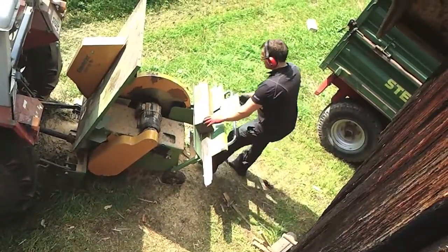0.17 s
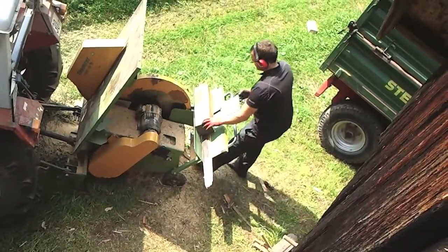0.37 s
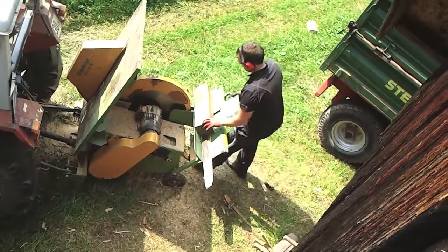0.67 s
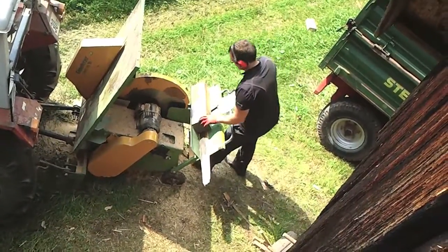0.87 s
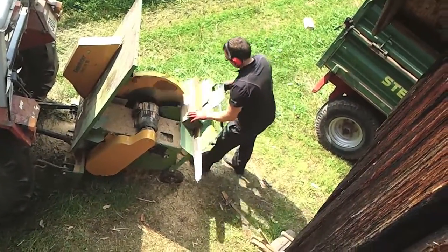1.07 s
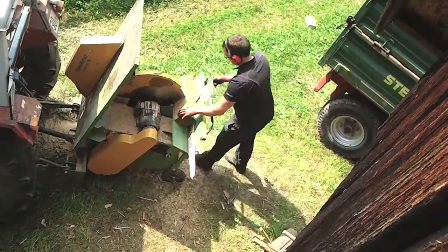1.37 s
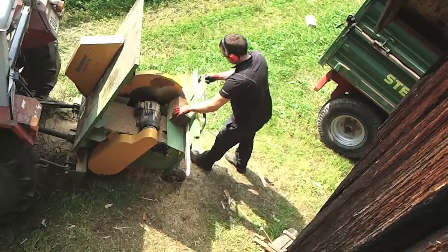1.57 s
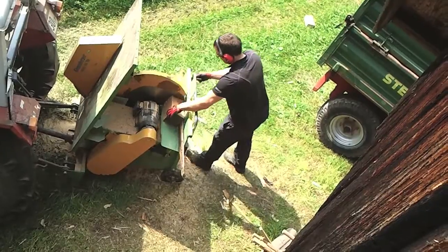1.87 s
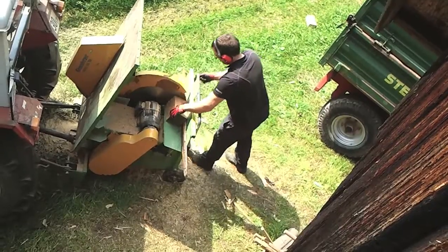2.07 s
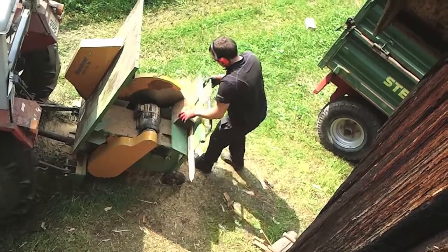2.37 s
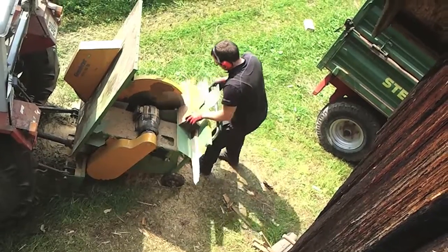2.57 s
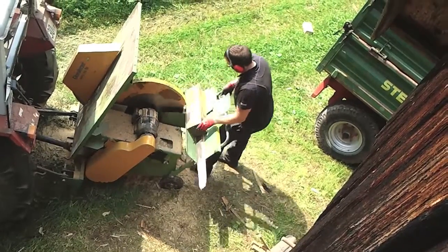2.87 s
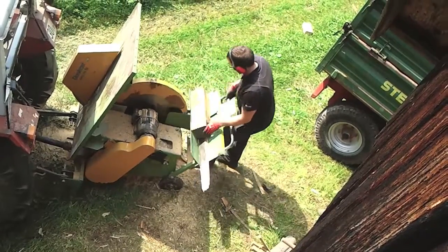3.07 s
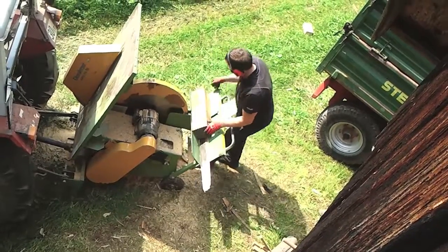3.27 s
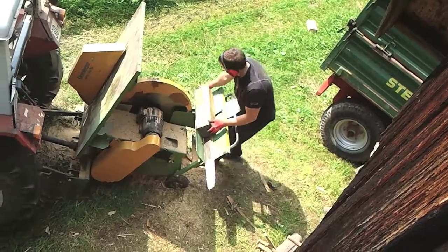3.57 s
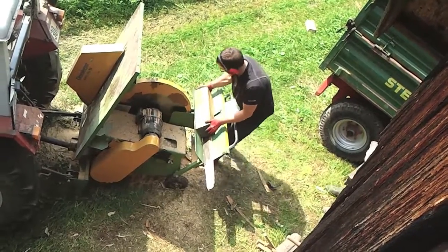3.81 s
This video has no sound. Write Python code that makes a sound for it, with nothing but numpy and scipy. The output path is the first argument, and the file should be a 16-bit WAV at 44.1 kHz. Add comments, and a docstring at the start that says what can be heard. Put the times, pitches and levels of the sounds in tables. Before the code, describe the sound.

Outdoor firewood saw heard from a few metres: idling drone and rushing teeth, a long harsh cut with sinking pitch, a shorter second cut, ringing blade, then log thumps and sheet-metal clatter over the drone.

```python
"""Tractor-driven circular saw outdoors

The exhaust throbs as a sum of shaft orders over engine rumble; the teeth whip air into sliding noise and a whine.
Two cuts tear wood with uneven tooth bites and ring the blade modes; the shaft slows, most in the first.
Sheet metal rattles and clacks as bursts of noise; wooden blows ring decaying modes over a clatter."""
import sys
import numpy as np
from scipy import signal
from scipy.fft import rfft, irfft, next_fast_len
from scipy.io import wavfile
from scipy.ndimage import uniform_filter1d, map_coordinates

SR = 44100
rng = np.random.default_rng(int(sys.argv[2]) if len(sys.argv) > 2 else 0)


def gain_from_db(level_db):
    """Turn a decibel level (scalar or array-like) into a linear amplitude factor."""
    decades = np.asarray(level_db, float) / 20
    return 10 ** decades


def transcribe(signal):
    """Save signal, clipped to [-1, 1], as a 16-bit WAV file at the path in sys.argv[1]."""
    frames = np.atleast_2d(signal).T
    limited = np.clip(frames, -1, 1)
    pcm = np.round(limited * 32767).astype(np.int16)
    wavfile.write(sys.argv[1], SR, pcm)


N = 173754
T = np.arange(N) / SR

# shaft speed: time_s, speed_hz
SHAFT_SPEED = [(0, 20.05), (1.07, 20.05), (1.2, 19), (1.42, 17.1), (1.76, 15), (1.86, 15.8), (2.0, 16.8),
               (2.3, 18.6), (2.44, 19.05), (2.6, 19.1), (2.75, 19.5), (3.0, 19.77), (3.94, 20.05)]
# exhaust and blade rush, sinking while the first cut is loud: time_s, exhaust_db, rush_db
DRIVE_LEVELS = [(0, -16, -16), (1.065, -18.5, -16.5), (1.11, -39.5, -29.5), (1.58, -40, -31),
                (1.62, -31, -17.5), (1.78, -26.5, -23), (1.82, -22, -21.5), (1.95, -15, -17.5),
                (2.3, -14.5, -18), (2.43, -16, -16.5), (2.455, -31, -18), (2.49, -17, -17),
                (2.7, -18.5, -17.5), (2.76, -16, -14), (3.0, -13, -14), (3.94, -16, -17)]
# exhaust gain on the shaft orders, before focus: freq_hz, gain_db
EXHAUST_GAIN = [(20, -24.5), (40, -20.5), (60, -13.5), (80, -5.5), (97, 0.5), (120, -12.5), (140, -19.5),
                (165, -22.5), (195, -18), (280, -34)]
# how sharply the exhaust favours its strongest order: time_s, gain_db_factor
EXHAUST_FOCUS = [(2.3, 1), (2.9, 1.5)]
# engine and machine rumble spectrum: freq_hz, relative_db_per_hz
RUMBLE_SPECTRUM = [(130, -10), (215, -8.5), (311, -14.5), (390, -8.5), (693, -13), (1000, -8),
                   (1300, -36.5)]
# low engine noise spectrum: freq_hz, relative_db_per_hz
SUB_SPECTRUM = [(15, -9.5), (60, 5), (140, 1), (180, -32.5)]
# air whipped by the teeth at idle, before the guard: freq_hz, relative_db_per_hz
RUSH_SPECTRUM = [(800, -40), (1000, -14), (1150, -6), (1350, -2), (1480, 0), (1620, -3), (1850, -10),
                 (2250, -14), (3200, -25), (4200, -60)]
# blade guard resonances: freq_hz, gain_db
GUARD_MODES = [(1180, 5), (1245, 5), (1370, 3), (1455, 1), (1630, 0), (1705, 0), (2075, 2)]
# machine hiss spectrum: freq_hz, relative_db_per_hz
HISS_SPECTRUM = [(2000, -1), (2800, -9), (3640, 1), (6250, -9), (7070, -26), (7950, -44.5)]
# cradle rattles, before RATTLE_DB: start_s, level_db
RATTLE_EVENTS = [(0.0508, -19), (0.1207, -14), (0.158, -22.5), (0.2054, -15), (0.2695, -19), (0.33, -17),
                 (0.375, -19), (0.4239, -16.5), (0.4988, -18), (0.7637, -22), (0.7977, -18.5),
                 (0.9535, -20.5), (1.858, -10), (1.925, -11.5), (2.031, -17), (2.213, -19), (2.2714, -19.5),
                 (3.1148, -15), (3.1622, -8.5), (3.2045, -9.5), (3.2335, -15.5), (3.258, -13.5),
                 (3.3099, -15.5), (3.3543, -11), (3.458, -17.5), (3.565, -14), (3.684, -15), (3.738, -17.5),
                 (3.782, -20.5)]
# sheet metal spectrum: freq_hz, relative_db_per_hz
SHEET_SPECTRUM = [(1000, -17.5), (1500, -3), (2140, -1.5), (3190, -15.5), (4650, -17.5), (6870, -23.5),
                  (7950, -36.5)]
# bright metal clacks: start_s, level_db, centre_hz
CLACK_EVENTS = [(2.822, -20, 5770), (3.115, -20.5, 6660), (3.355, -26, 5040)]
# tumbling wood: start_s, level_db, centre_hz
KNOCK_EVENTS = [(3.118, -17.5, 443), (3.13, -13, 209), (3.166, -11.5, 382), (3.168, -17.5, 200),
                (3.198, -15, 520), (3.28, -14, 225)]
# wood modes: freq_hz
WOOD_MODES_HZ = [191, 226, 365, 400, 461, 689]
# one list per cut: time_s, cut_db, blade_ring_db
CUT_LEVELS = [
    [(1.068, -36.5, -30.5), (1.082, -10.5, -52), (1.17, -12, -35.5), (1.22, -9.5, -22), (1.33, -13, -26),
     (1.44, -12, -52.5), (1.6, -12, -27.5), (1.72, -8.5, -24.5), (1.79, -13.5, -14), (1.83, -17.5, -13.5),
     (1.845, -24, -19), (1.9, -36.5, -21), (2.0, -36, -22), (2.06, -55.5, -50.5)],
    [(2.2, -38, -40), (2.365, -32.5, -23), (2.39, -19, -22), (2.435, -27.5, -25.5), (2.447, -12.5, -22.5),
     (2.49, -19, -18.5), (2.6, -15.5, -25), (2.69, -13.5, -22.5), (2.74, -18.5, -19), (2.85, -26, -15.5),
     (2.88, -27, -19.5), (2.96, -63, -20), (3.02, -52.5, -26.5)],
]
# tearing fibre spectrum, before the bites and blade colour it: freq_hz, relative_db_per_hz
TEAR_SPECTRUM = [(700, -36.5), (1000, -9.5), (1400, -5.5), (1880, -8.5), (2300, -9), (4320, -6),
                 (6750, -10), (7390, -12.5), (7950, -15)]
# shaken log spectrum: freq_hz, relative_db_per_hz
LOG_SPECTRUM = [(90, -30), (140, -5.5), (458, -2), (900, -1), (1300, -27)]
# blade modes: freq_hz, relative_db (the level applies to the ring only)
BLADE_MODES = [(1700, -7), (1840, -5), (1965, 1), (2030, -5), (2245, -11), (2343, -11), (2546, -14),
               (2640, -15), (2845, -15), (3500, -18), (3835, -17), (4190, -17), (4550, -20)]
# microphone band limit: freq_hz, gain_db
MIC_RESPONSE = [(7000, 0), (7800, -20), (8100, -33.5), (8400, -49.5)]

IDLE_HZ, FULL_LOAD_SAG_HZ = 20.05, 3.4
SECOND_IDLE_DB, SECOND_DB_PER_HZ = -17, 5.2  # re exhaust; growth per Hz of sag
RUMBLE_IDLE_DB, RUMBLE_DB_PER_HZ, SUB_DB = -24, 1.04, -29.5  # before the small exhaust-level coupling
GUARD_WIDTH_HZ = 18
SLIDE_EXPONENT = 1.05  # rush pitch against speed ratio
WHINE_DB = -14  # re rush
HISS_MEAN_DB = -35.5
TEETH = 72
RATTLE_DB, RATTLE_HOLD_S, RATTLE_T60_S = -3, 0.014, 0.19
CLACK_HOLD_S, CLACK_T60_S, CLACK_Q = 0.016, 0.06, 3
KNOCK_T60_S, CLATTER_T60_S, CLATTER_DB, WOOD_Q = 0.17, 0.95, -10, 5  # clatter re knock level_db
LOG_DB = -14  # re cut
BLADE_T60_S = 0.15
BLADE_IN_TEAR_DB, MODE_DRIFT_DB = 0, 4  # mode level in the tear; rms-like scale of its drift
OFFSET = 0.005


def unit(x):
    """Scale to rms 1."""
    return x / np.sqrt(np.mean(x ** 2) + 1e-20)


def along(points, hz):
    """Interpolate (Hz, value) points on a log frequency axis."""
    f, v = np.transpose(points)
    return np.interp(np.log(hz + 1), np.log(f + 1), v)


def curves(rows, outside=None):
    """One value per sample for each column after the time."""
    s, *cols = np.transpose(rows)
    return np.array([np.interp(T, s, c, outside, outside) for c in cols])


def wobble(rate_hz):
    """Smooth random curve with rate_hz knots a second."""
    knots = rng.standard_normal(int(N * rate_hz / SR) + 4)
    return map_coordinates(knots, [T * rate_hz])


def filtered(x, response):
    """Multiply the spectrum of x by a response of frequency."""
    m = next_fast_len(N + SR // 2)
    return irfft(rfft(x, m) * response(np.fft.rfftfreq(m, 1 / SR)), m)[..., :N]


def peaks(table):
    """Causal sum of resonances (centre Hz, width Hz, dB), alternating in sign."""
    def response(f):
        return sum((-1) ** k * gain_from_db(db) * 1j * f * width / (centre * centre - f * f + 1j * f * width)
                   for k, (centre, width, db) in enumerate(table))
    return response


def noise(spectrum, patchy_db, source=None):
    """Coloured noise of rms 1 with time-frequency patches of random gain."""
    padded = rng.standard_normal(N + 512) if source is None else np.pad(source, (0, 512))
    z = signal.stft(padded, nperseg=512)[2]
    field = uniform_filter1d(rng.standard_normal(z.shape), 4, 0)
    field = uniform_filter1d(field, 8, 1)
    x = signal.istft(z * gain_from_db(patchy_db * unit(field)), nperseg=512)[1][:N]
    return unit(filtered(x, lambda hz: gain_from_db(along(spectrum, hz))))


def bursts(events, hold_s, t60_s):
    """Envelope: each event jumps up, holds and dies; powers add."""
    power = np.zeros(N)
    for start_s, db in events:
        age = T - start_s
        decay_db = 60 * np.clip(age - hold_s, 0, None) / t60_s
        attack = 1 - np.exp(-np.abs(age) / 0.0015)
        power += (age > 0) * gain_from_db(db - decay_db) ** 2 * attack
    return np.sqrt(power)


def engine():
    """Shaft orders through the exhaust; second order and rumble swell as load sags the speed."""
    speed_hz, exhaust_db = curves(SHAFT_SPEED)[0], curves(DRIVE_LEVELS)[0]
    focus, = curves(EXHAUST_FOCUS)
    sag_hz = np.minimum(IDLE_HZ - speed_hz, FULL_LOAD_SAG_HZ)
    phase = 2 * np.pi * np.cumsum(speed_hz) / SR
    orders = 0
    for k in range(1, 15):
        gain_db = focus * along(EXHAUST_GAIN, k * speed_hz) + 0.5 * wobble(6)
        orders = orders + gain_from_db(gain_db) * np.cos(k * phase - 1.1 * k * k)
    second = gain_from_db(SECOND_IDLE_DB + SECOND_DB_PER_HZ * sag_hz) * np.sin(2 * phase)
    rumble = gain_from_db(RUMBLE_IDLE_DB + RUMBLE_DB_PER_HZ * sag_hz) * noise(RUMBLE_SPECTRUM, patchy_db=1)
    sub = gain_from_db(SUB_DB) * noise(SUB_SPECTRUM, patchy_db=1)
    floor_gain = gain_from_db(0.18 * (exhaust_db - exhaust_db[0]))
    return gain_from_db(exhaust_db - 0.13) * (orders + second) + floor_gain * (rumble + sub)


def blade_rush():
    """Tooth air noise slides with the speed through guard resonances, with a tooth whine and machine hiss."""
    speed_hz = curves(SHAFT_SPEED)[0]
    position = np.cumsum((speed_hz / IDLE_HZ) ** SLIDE_EXPONENT)
    rush = map_coordinates(noise(RUSH_SPECTRUM, patchy_db=0), [position], mode="mirror")
    guard = peaks([(hz, GUARD_WIDTH_HZ, db) for hz, db in GUARD_MODES])
    rush = unit(filtered(rush, lambda f: np.sqrt(1 + np.abs(guard(f)) ** 2)))
    tooth_tone = np.sin(2 * np.pi * TEETH * np.cumsum(speed_hz) / SR)
    whine = gain_from_db(WHINE_DB) * unit(wobble(40)) * tooth_tone
    hiss = gain_from_db(HISS_MEAN_DB + 1.4 * wobble(10)) * noise(HISS_SPECTRUM, patchy_db=3.5)
    return gain_from_db(curves(DRIVE_LEVELS)[1] + 0.99 * wobble(27)) * (rush + whine) + hiss


def cradle():
    """Sheet metal rattles and clacks; wooden blows ring the modes near their centres, over a clatter."""
    rattle_envelope = gain_from_db(RATTLE_DB) * bursts(RATTLE_EVENTS, RATTLE_HOLD_S, RATTLE_T60_S)
    rattle = rattle_envelope * noise(SHEET_SPECTRUM, patchy_db=-1.5)
    clack = np.zeros(N)
    for start_s, db, hz in CLACK_EVENTS:
        metal = unit(filtered(rng.standard_normal(N), peaks([(hz, hz / CLACK_Q, 0)])))
        clack += bursts([(start_s, db)], CLACK_HOLD_S, CLACK_T60_S) * metal
    wood_response = peaks([(hz, hz / WOOD_Q, 0) for hz in WOOD_MODES_HZ])
    wood = unit(filtered(rng.standard_normal(N), wood_response))
    thump, t = np.zeros(N + SR), np.arange(SR // 2) / SR
    for start_s, db, centre_hz in KNOCK_EVENTS:
        ring = 0
        for hz in WOOD_MODES_HZ:
            mode_db = rng.normal(0, 2.4) - 27 * np.log2(hz / centre_hz) ** 2
            ring = ring + gain_from_db(mode_db) * np.sin(2 * np.pi * hz * t)
        envelope = gain_from_db(db - 60 * t / KNOCK_T60_S) * (1 - np.exp(-t / 0.003))
        thump[round(start_s * SR):][:len(t)] += envelope * ring
    clatter_envelope = bursts([row[:2] for row in KNOCK_EVENTS], 0.009, CLATTER_T60_S)
    return rattle + clack + thump[:N] + gain_from_db(CLATTER_DB) * clatter_envelope * wood


def cutting():
    """Uneven tooth bites tear the fibres and ring the blade modes, over the noise of the shaken log."""
    level, ring = sum(gain_from_db(curves(rows, -120)) for rows in CUT_LEVELS)
    tooth = np.cumsum(curves(SHAFT_SPEED)[0] * TEETH / SR)
    sizes = gain_from_db(1.3 * rng.standard_normal(int(tooth[-1]) + 2))[tooth.astype(int)]
    bites = unit(sizes * np.exp(-1.5 * (tooth % 1)) * rng.standard_normal(N))
    flutter = gain_from_db(0.24 * wobble(25.33) + 2.2 * wobble(90))
    width_hz = np.log(1000) / np.pi / BLADE_T60_S
    modes = [filtered(bites, peaks([(hz, width_hz, 0)])) for hz, _ in BLADE_MODES]
    song = unit(sum(gain_from_db(db) * mode for mode, (_, db) in zip(modes, BLADE_MODES)))
    # each mode swells on its own in the tear
    colour = sum(gain_from_db(MODE_DRIFT_DB * wobble(14)) * mode for mode in modes)
    tear = noise(TEAR_SPECTRUM, 0.84, bites + gain_from_db(BLADE_IN_TEAR_DB) * colour)
    log = gain_from_db(LOG_DB) * noise(LOG_SPECTRUM, patchy_db=3)
    return level * (flutter * tear + log) + ring * song


def scene():
    """Sum all sources into one channel."""
    return (engine() + blade_rush() + cradle() + cutting())[None]


def top_cut(x):
    """Nothing passes above the cut-off."""
    return signal.sosfilt(signal.butter(12, 8100, fs=SR, output="sos"), x)


def record(dry):
    """Soft clipping, microphone band limit and a small constant offset."""
    clipped = dry / (1 + np.abs(dry / 0.7) ** 4) ** (1 / 4)
    limited = filtered(clipped, lambda hz: gain_from_db(along(MIC_RESPONSE, hz) - 80 * (hz > 8450)))
    return top_cut(limited + OFFSET)


dry = scene()
out = record(dry)
transcribe(out)
```